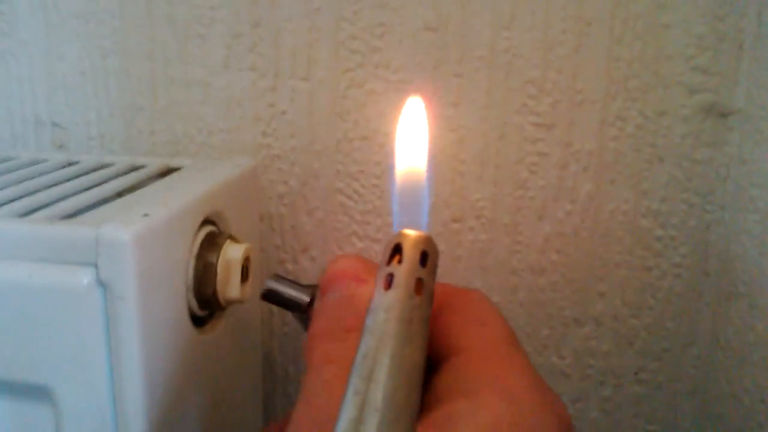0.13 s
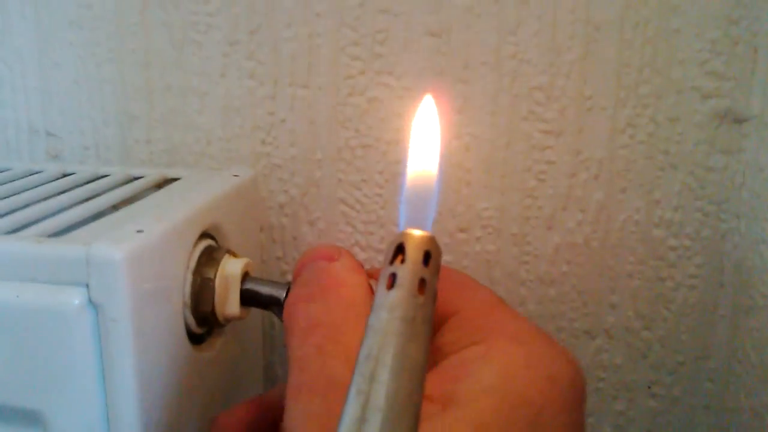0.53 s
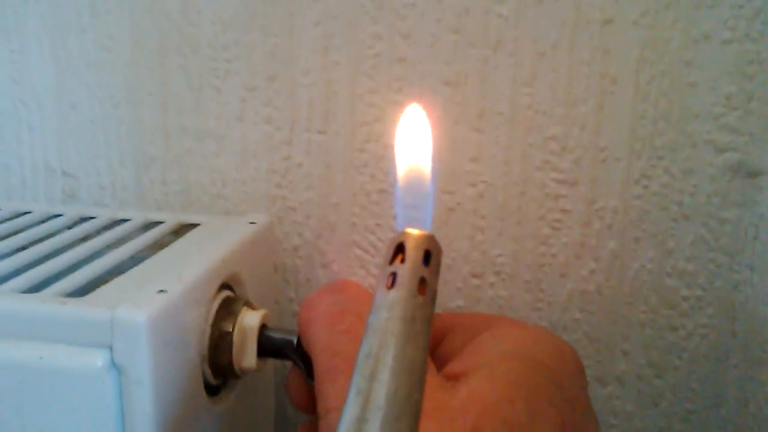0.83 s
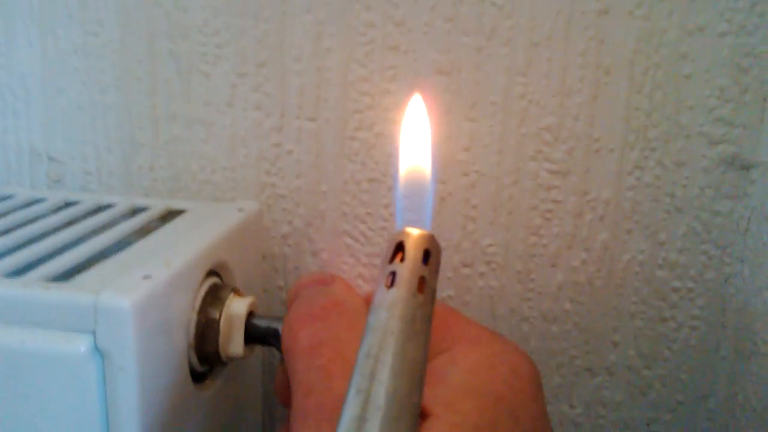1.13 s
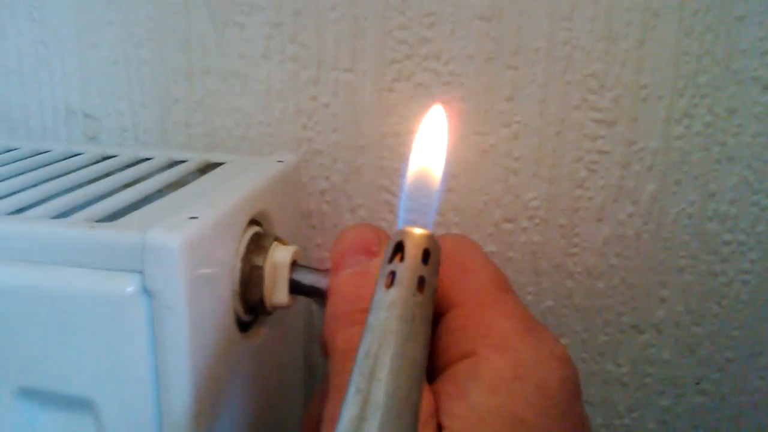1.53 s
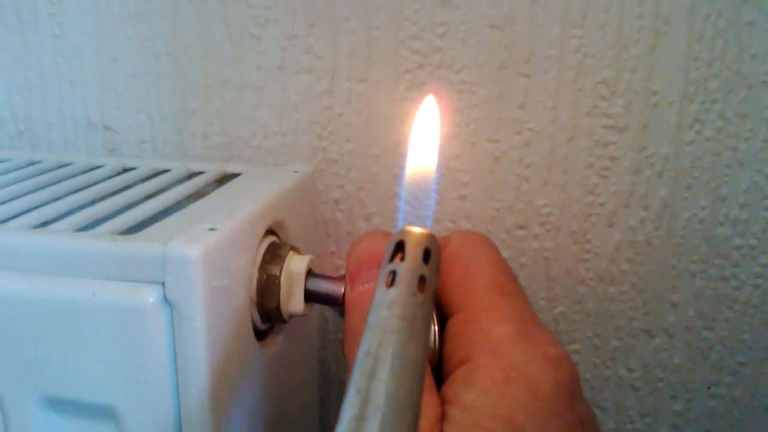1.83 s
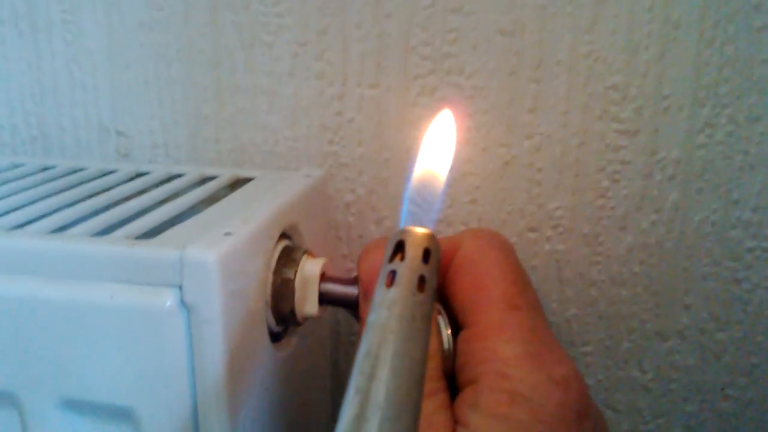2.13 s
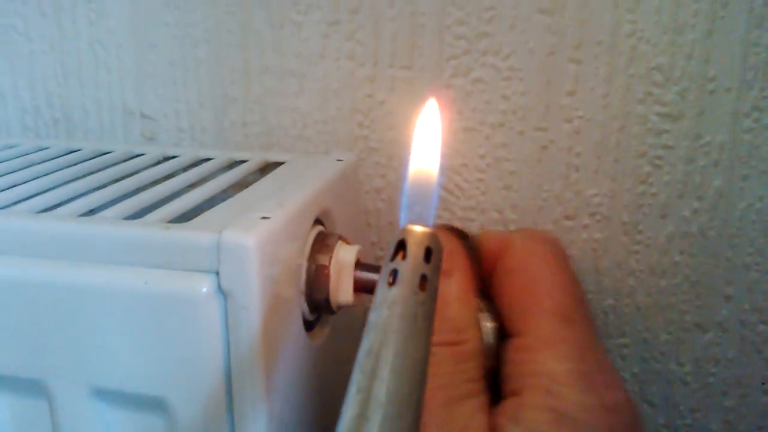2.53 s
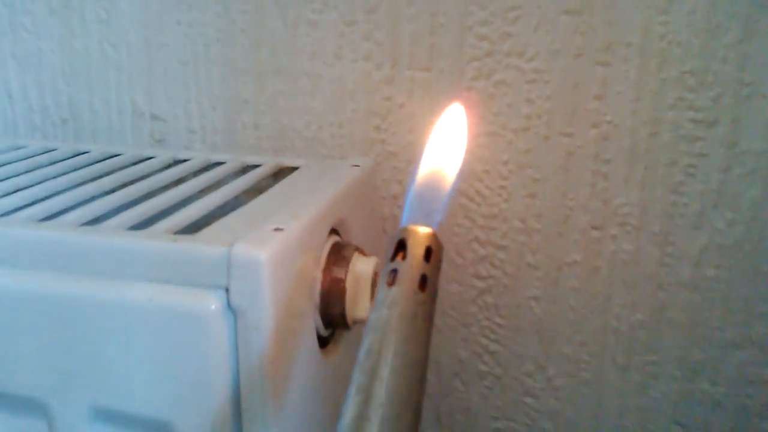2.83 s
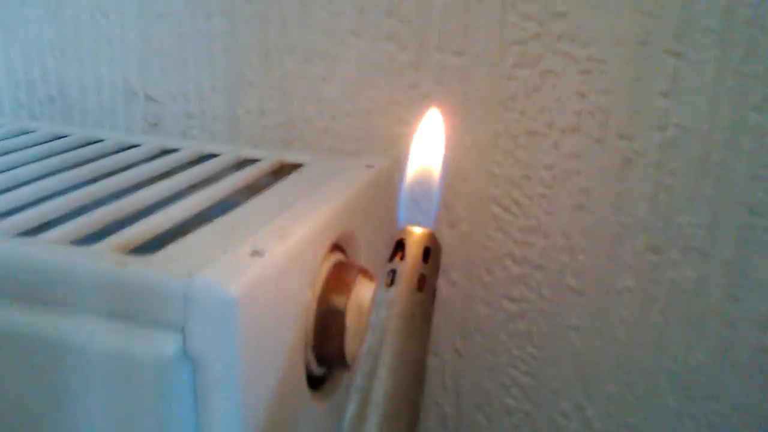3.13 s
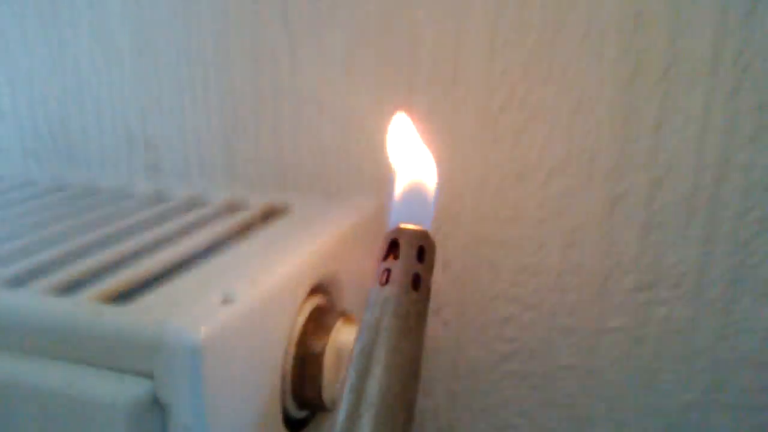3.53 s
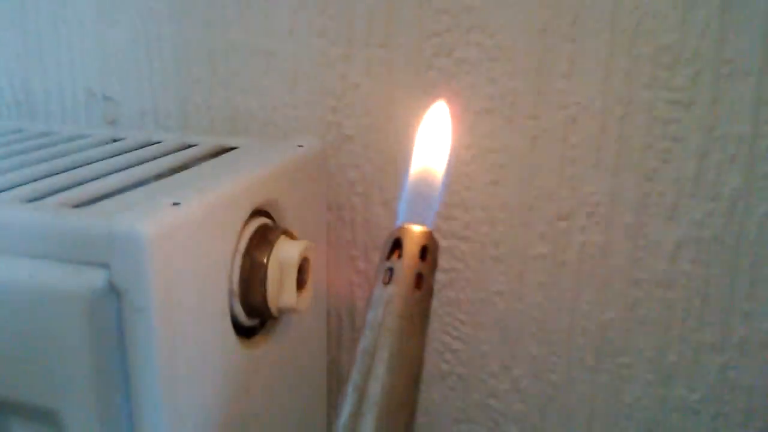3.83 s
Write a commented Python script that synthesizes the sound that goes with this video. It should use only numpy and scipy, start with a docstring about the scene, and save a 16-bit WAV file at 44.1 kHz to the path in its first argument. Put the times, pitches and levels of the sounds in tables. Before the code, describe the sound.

Gas hisses from a radiator valve, close up in a quiet room. First a key softly rubs and clicks until 1.4 seconds. A short hiss comes at 1.5 seconds and stops. From 2.2 seconds it returns, growing loud and bright. At 3.4 seconds the gas ignites with a low, fluttering, crackling burst that quickly fades, and the hiss continues until 4 seconds. A faint, high whine runs throughout.

```python
"""In a quiet room, a key is fitted to a steel radiator's bleed valve: a hand rubs, the key clicks.
Gas hisses out briefly, is shut off, then flows fully. A lighter held to the jet sets it alight
with a low, fluttering burst that soon dies and leaves the room ringing, while the hiss goes on.
A thin, high whine sputters faintly throughout."""
import sys
import numpy as np
from scipy import signal
from scipy.fft import rfft, irfft
from scipy.io import wavfile

SR = 44100
rng = np.random.default_rng(int(sys.argv[2]) if len(sys.argv) > 2 else 0)


def log_audio(samples):
    """Write samples as a 16-bit WAV file to the path given in sys.argv[1]."""
    # one column per channel
    frames = np.atleast_2d(samples).T
    # limit to full scale, then quantise
    limited = np.clip(frames, -1, 1)
    pcm = np.round(limited * 32767).astype(np.int16)
    wavfile.write(sys.argv[1], SR, pcm)


N = 176400
T = np.arange(N) / SR
FREQUENCIES = np.fft.rfftfreq(N, 1 / SR)
CUTOFF_HZ = 15850


def from_db(db):
    """Turn decibels into a number to multiply by."""
    return 10 ** (np.asarray(db) / 20)

def unit_level(x):
    """Scale a sound to an average (rms) strength of 1."""
    return x / np.sqrt(np.mean(x ** 2) + 1e-20)

def colour(x, spectrum):
    """Give a sound the lows and highs listed in a table, at strength 1."""
    hz, db = np.transpose(spectrum)
    gain = from_db(np.interp(np.log(FREQUENCIES + 1), np.log(hz), db))
    cepstrum = irfft(np.log(gain), N)
    cepstrum[N // 2:] = 0   # so the filter rings after a sound, never before it
    return unit_level(irfft(rfft(x) * np.exp(2 * rfft(cepstrum)), N))

def drift(rate_hz):
    """A smooth random wobble, typically about 1 in size."""
    return unit_level(irfft(rfft(rng.standard_normal(N)) / (1 + (FREQUENCIES / rate_hz) ** 2), N))

def noise(spectrum, rough_db=0, rate_hz=100):
    """Coloured noise whose strength flutters by about rough_db."""
    return colour(rng.standard_normal(N) * from_db(rough_db * drift(rate_hz)), spectrum)

def swell(start, rise, hold, fall, db):
    """A loudness curve that climbs, holds and dies away; times are in seconds."""
    age = T - start
    return from_db(db) * np.clip(age / rise, 0, 1) * np.exp(-np.maximum(age - rise - hold, 0) / fall)

def resonate(x, hz, t60):
    """Ring at one pitch, fading by 60 dB in t60 seconds."""
    r = np.exp(-np.log(1000) / (t60 * SR))
    feedback = [1, -2 * r * np.cos(2 * np.pi * hz / SR), r * r]
    return signal.lfilter(np.array([1, 0, -1]) * (1 - r * r) / 2, feedback, x + 1e-18)

def wall_echoes(x, t60=0.16, db=-9):
    """Add the dense, short echoes between radiator and wall."""
    age = T[:int(t60 * SR)]
    echoes = rng.standard_normal(len(age)) * from_db(-60 * age / t60)
    return x + from_db(db) * signal.fftconvolve(x, echoes / np.linalg.norm(echoes))[:N]


# The room's background noise. Each row: frequency in Hz, relative level in dB.
ROOM_COLOUR = [(25, -1.5), (55, 3.5), (170, 2), (400, -11.5), (1300, -30), (2800, -39), (10000, -29),
               (16000, -40)]

def room():
    """A faint, steady rumble."""
    return from_db(-55) * noise(ROOM_COLOUR)

def whine(hz=11700, db=-60, dip_db=11):
    """A thin, high tone that wavers and dips at random."""
    tone = np.sqrt(2) * np.sin(2 * np.pi * hz * T + 0.5 * drift(10))
    dip = np.clip(2 * drift(13) - 1, 0, 1)
    return from_db(db - dip_db * dip) * tone


# The sound of friction. Each row: frequency in Hz, relative level in dB.
RASP_COLOUR = [(100, -9), (250, 7), (600, -2.5), (850, 3.5), (1150, -11), (1600, -10.5), (2080, 3.5),
               (2350, -2), (2950, -0.5), (3900, -8), (4900, -5), (8700, -6.5), (16000, -19)]

def rasp(rows):
    """Swells of grainy noise, each with one ringing pitch."""
    friction = noise(RASP_COLOUR, rough_db=1.5, rate_hz=390)
    white = rng.standard_normal(N)
    out = np.zeros(N)
    for *shape, hz in rows:
        ring = unit_level(resonate(white, hz, t60=0.007))
        out += swell(*shape) * unit_level(friction + 0.55 * ring)
    return out


# Rubs on the valve. Each row: start, rise, hold and fall in seconds, level in dB, ring pitch in Hz.
RUB_STROKES = [(-.03, 0.039, 0.2, 0.087, -39, 2850), (0.32, 0.062, 0.12, 1, -51, 880),
               (0.837, 0.04, 0.062, 0.052, -38.5, 5300), (1.057, 0.0077, 0.031, 0.28, -53.5, 2770)]

def rubbing():
    """Hand and key rub on the valve, and the friction makes the metal ring."""
    return rasp(RUB_STROKES)


# Sharp clicks and knocks, and one short, high spit near the end. Each row: start in seconds,
# level in dB, ring time in seconds, low edge and high edge of the sound in Hz.
SHARP_SOUNDS = [(0.3802, -29, 0.0023, 700, 15000), (.489, -24, 0.013, 2700, 7570),
                (0.771, -41, 0.028, 200, 5850), (0.9978, -21, 0.00069, 2500, 11700),
                (1.0498, -25.5, 0.015, 200, 4360), (1.423, -38.5, 0.017, 300, 10300),
                (1.435, -30.5, 0.0029, 4000, 11900), (2.67, -27, 0.019, 440, 7350),
                (3.946, -20.5, 0.011, 5500, 7500), (3.972, -22.5, 0.002, 1010, 7000)]

def clicks_and_spit():
    """Each sharp sound is a snap, a dense ring and a faint tail."""
    out = np.zeros(N)
    for start, db, ring_s, low_hz, high_hz in SHARP_SOUNDS:
        age = T[:N - int(start * SR)]
        attack_s = 0.27 * ring_s
        fade = np.exp(-age / ring_s) + from_db(-14.5) * np.exp(-age / (3.66 * ring_s))
        burst = rng.standard_normal(len(age)) * fade * np.minimum(age / attack_s, 1)
        burst[int(attack_s * SR)] += 1.2   # the snap
        band = np.vstack([signal.butter(1, low_hz, "high", fs=SR, output="sos"),
                          signal.butter(6, high_hz, fs=SR, output="sos")])
        make_up = np.sqrt(SR / 2 / high_hz)   # restores the strength lost with the treble
        out[-len(age):] += from_db(db) * make_up * signal.sosfilt(band, burst + 1e-18)
    return out


# The squeak's tones. Each row: pitch in Hz, relative level in dB, seconds to fade by 60 dB.
SQUEAK_TONES = [(937, 11, 0.047), (1086, -8.5, 0.049)]

def key_squeak():
    """The key squeaks briefly as it slips into place."""
    white = rng.standard_normal(N)
    ring = sum(from_db(db) * resonate(white, hz, t60) for hz, db, t60 in SQUEAK_TONES)
    return unit_level(ring) * swell(0.381, 0.003, 0.0093, 0.0094, db=-31)


# Bumps of the hand. Each row: start, rise, hold and fall in seconds, level in dB.
BUMPS = [(0.765, 0.013, 0.022, 0.014, -35.5), (0.818, 0.027, 0.32, 0.39, -45.5)]
# Their dull sound. Each row: frequency in Hz, relative level in dB.
BUMP_COLOUR = [(25, 7), (55, 5), (150, 2.5), (900, -16), (6000, -44)]

def handling():
    """The moving hand makes low, rough thuds."""
    return noise(BUMP_COLOUR, rough_db=3, rate_hz=65) * sum(swell(*row) for row in BUMPS)


# The hiss's echo as the microphone moves. Each row: time in seconds, delay in milliseconds.
WALL_DELAY = [(2.8, 0.64), (3.05, 0.7), (3.45, 0.739), (3.65, 0.652), (4.0, 0.72)]

def wall_swish(hiss):
    """A near and a far echo with changing delays mix with the hiss and make it swish."""
    delay_s = np.interp(T, *np.transpose(WALL_DELAY)) / 1000
    near = np.interp(T - delay_s, T, hiss)
    far = np.interp(T - 2.05 * delay_s, T, hiss)
    return unit_level(hiss + 0.42 * near + 0.22 * far)

def shimmer(hiss, spacing_hz=1300, depth_db=1.15):
    """Each frequency band of the hiss swells and fades a little on its own."""
    spectrum, out = rfft(hiss), np.zeros(N)
    for centre in np.arange(0, CUTOFF_HZ + spacing_hz, spacing_hz):
        band = np.maximum(1 - abs(FREQUENCIES - centre) / spacing_hz, 0)
        out += irfft(spectrum * band, N) * from_db(depth_db * drift(4))
    return out


# How loudly the gas flows. Each row: time in seconds, level in dB.
GAS_FLOW = [(1.49, -62), (1.54, -43), (1.61, -41.5), (1.655, -33.5), (1.76, -34), (1.785, -62.5),
            (2.145, -73), (2.19, -40.5), (2.27, -35), (2.535, -27), (2.565, -23), (2.8, -21.5),
            (3.4, -19.5), (4.0, -19.5)]
# The hiss shielded by the hand, and in the clear. Each row: frequency in Hz, relative level in dB.
SHIELDED_COLOUR = [(300, -44), (1500, -30), (2200, -17.5), (3000, -4), (3800, -8), (4700, 1.5), (5800, -15),
                   (7300, -5), (7650, -12), (8400, -1.5), (10300, -9), (10850, 2), (12150, -1), (13500, -1),
                   (15500, -5.5)]
CLEAR_COLOUR = [(200, -19), (850, -16.5), (1400, -27.5), (2900, -15.5), (4500, -10.5), (7700, -6.5),
                (8700, -1), (10250, -2), (10850, 3.5), (12300, 0.5), (14200, 2.5), (15700, -1.5)]
HAND_LEAVES_S, HAND_GONE_S, IGNITE_S = 2.27, 2.91, 3.416

def gas_jet(smother_db=10):
    """The gas's hiss turns wide and bright as the hand moves away; the flame briefly smothers it."""
    away = np.clip((T - HAND_LEAVES_S) / (HAND_GONE_S - HAND_LEAVES_S), 0, 1)
    clear_hiss = wall_swish(noise(CLEAR_COLOUR, rough_db=1))
    hiss = np.sqrt(1 - away) * noise(SHIELDED_COLOUR) + np.sqrt(away) * clear_hiss
    flow_db = np.interp(T, *np.transpose(GAS_FLOW))
    burning = np.interp(T - IGNITE_S, [0, 0.03, 0.14, 0.47], [0, 1, 1, 0])
    return shimmer(hiss) * from_db(flow_db - smother_db * burning)


# The jet brushes the lighter's flame. Each row: start, rise, hold and fall in seconds,
# level in dB, ring pitch in Hz.
SPUTTERS = [(2.82, 0.059, 0.033, 0.2, -35, 800), (2.972, 0.042, 0.028, 0.048, -32.5, 2400)]

def lighter_sputter(depth_db=3):
    """The jet tears at the lighter's flame before the gas catches."""
    return rasp(SPUTTERS) * unit_level(from_db(depth_db * drift(70)))

def sinking_tone(start=2.87, start_hz=264.5, octaves_per_s=1.3):
    """A soft, hollow band of noise glides down as the lighter nears the jet."""
    hz = start_hz * 2 ** (-octaves_per_s * np.clip(T - start, 0, 1))
    phase = 2 * np.pi * np.cumsum(hz) / SR
    hollow = drift(25) * np.sin(phase) + drift(26) * np.cos(phase)
    return hollow * swell(start, 0.095, 0.25, 0.13, db=-45)


# Light touches of metal. Each row: start in seconds, relative level in dB, pitch in Hz.
METAL_TOUCHES = [(3.015, -28, 2360), (3.045, -22.5, 2470), (3.754, -27, 2700), (3.954, -14, 2795)]

def clinks(t60=0.0086):
    """Metal held in the hand rings with two tones that die almost at once."""
    out = np.zeros(N)
    for start, db, hz in METAL_TOUCHES:
        phase = 2 * np.pi * hz * (T - start)
        tones = np.sin(phase) + from_db(-1.5) * np.sin(2.23 * phase)
        out += 2 * tones * swell(start, 0.00054, 0, t60 / np.log(1000), db)
    return out


# The flame's roar, its crackle, and the pitches the room rings at.
# Each row: frequency in Hz, relative level in dB.
ROAR_COLOUR = [(30, -14), (70, -12), (110, -4.5), (190, -2.5), (340, 3), (460, -6), (560, -3.5),
               (760, -7.5), (950, -30.5), (2000, -22), (4000, -56.5)]
CRACKLE_COLOUR = [(600, -18), (1020, -4), (1170, 14.5), (1310, 2), (1400, 10.5), (2200, 6.5), (2850, 2),
                  (3200, -17), (4000, -3.5), (7000, -22)]
ROOM_TONES = [(104, 3.5), (143, 6), (244, 9.5), (289, 1.5), (366, 4), (388, 4.5), (535, 9), (602, 3)]

def flame(puffs_per_s=115, hold_s=0.12, darken_s=0.34, fall_db_per_s=78.5):
    """Gas burns in uneven puffs: it roars and crackles, grows dull and leaves the room ringing."""
    puff_count = np.floor(np.cumsum(puffs_per_s * np.exp(0.4 * drift(60))) / SR)
    puffs = unit_level(np.diff(puff_count, prepend=0) * from_db(3.3 * drift(150)))
    turbulence = 0.5 * rng.standard_normal(N)
    bright = colour(puffs + turbulence, ROAR_COLOUR)
    dull = signal.sosfiltfilt(signal.butter(2, 480, fs=SR, output="sos"), bright)
    age = T - IGNITE_S
    dying_s = np.maximum(age - hold_s, 0)
    spent = np.minimum(dying_s / darken_s, 1)
    loudness = np.clip(age / 0.0058, 0, 1) * from_db(-11 - fall_db_per_s * dying_s)
    roar = ((1 - spent) * bright + spent * dull) * loudness
    ringing = sum(from_db(db - 2) * resonate(roar, hz, t60=0.48) for hz, db in ROOM_TONES)
    crackle = colour(puffs + 0.85 * rng.standard_normal(N), CRACKLE_COLOUR)
    crackle *= swell(IGNITE_S, 0.095, 0.048, 0.035, db=-21.5)
    return roar + ringing + wall_echoes(crackle)


# The flame flares up unevenly. Each row: time of the peak in seconds, level in dB, pitch in Hz.
FLARE_UPS = [(3.507, -11, 540), (3.562, -18, 340), (3.632, -20.5, 220), (3.695, -20, 290)]

def flares(width_s=0.019):
    """Brief, hollow swells of the flame flutter in pitch and strength."""
    out = np.zeros(N)
    for peak_s, db, hz in FLARE_UPS:
        phase = 2 * np.pi * np.cumsum(hz * np.exp(0.2 * drift(100))) / SR
        hump = np.exp(-0.5 * ((T - peak_s) / width_s) ** 2)
        out += from_db(db + 2 * drift(115)) * np.sin(phase) * hump
    return out


# Gas striking the lighter's nozzle. Each row: frequency in Hz, relative level in dB.
NOZZLE_COLOUR = [(3800, -12), (5600, -2.5), (7000, -5.5), (8200, 3.5), (9800, -7.5), (15000, -8)]

def nozzle_hiss():
    """The jet glances off the lighter with a short extra hiss."""
    return noise(NOZZLE_COLOUR) * swell(3.61, 0.045, 0.084, 0.082, db=-25.5)

def scene():
    """All the sounds, heard close up in one channel."""
    gas = gas_jet() + nozzle_hiss() + flame() + flares()
    small = rubbing() + clicks_and_spit() + key_squeak() + handling() + lighter_sputter() + clinks()
    return (gas + wall_echoes(small) + room() + whine() + sinking_tone())[None]

def record(dry):
    """Round off the peaks and cut the highest treble."""
    return signal.sosfilt(signal.ellip(12, 0.1, 90, CUTOFF_HZ, fs=SR, output="sos"), np.tanh(dry))


dry = scene()
out = record(dry)
log_audio(out)
```